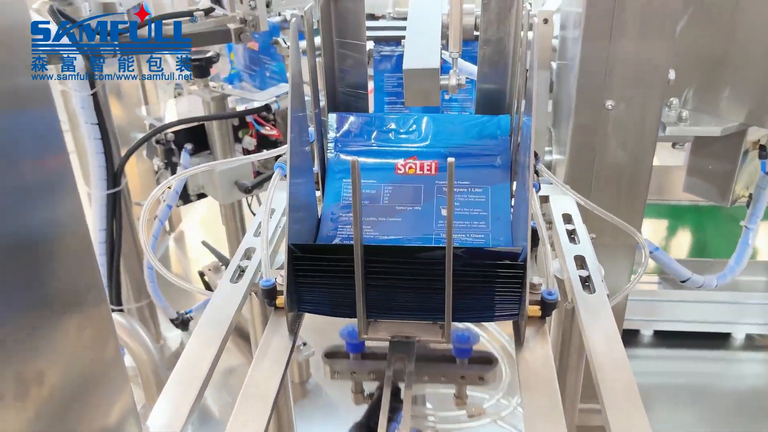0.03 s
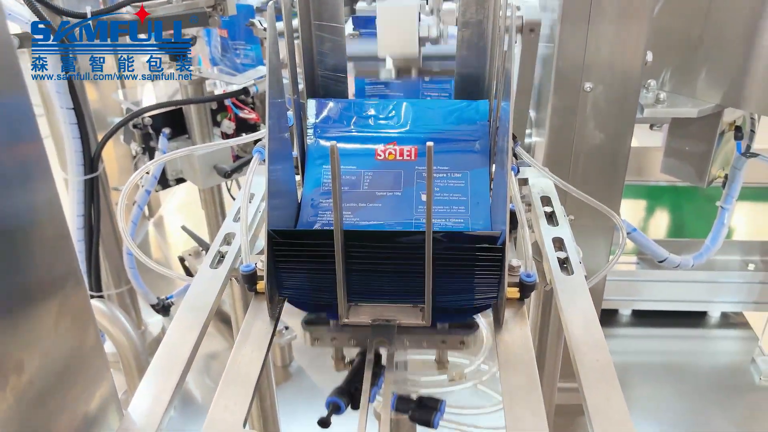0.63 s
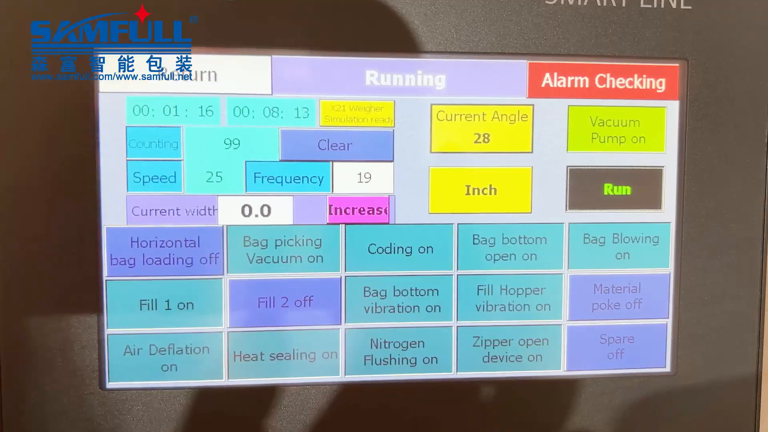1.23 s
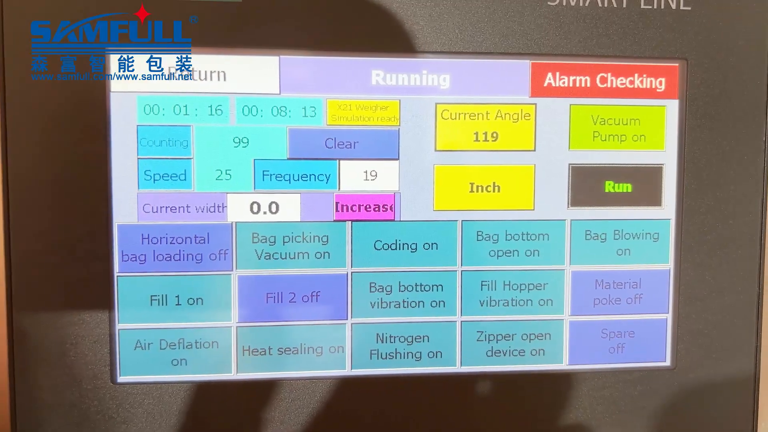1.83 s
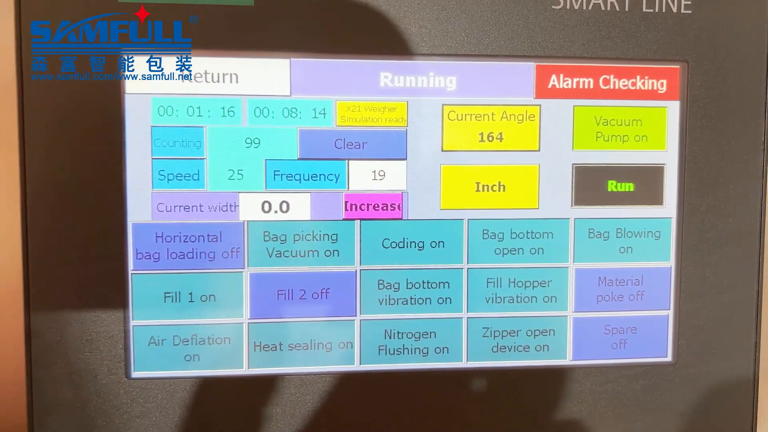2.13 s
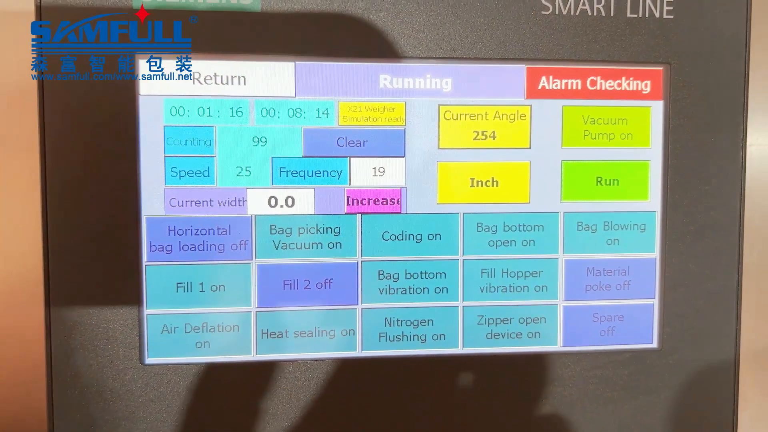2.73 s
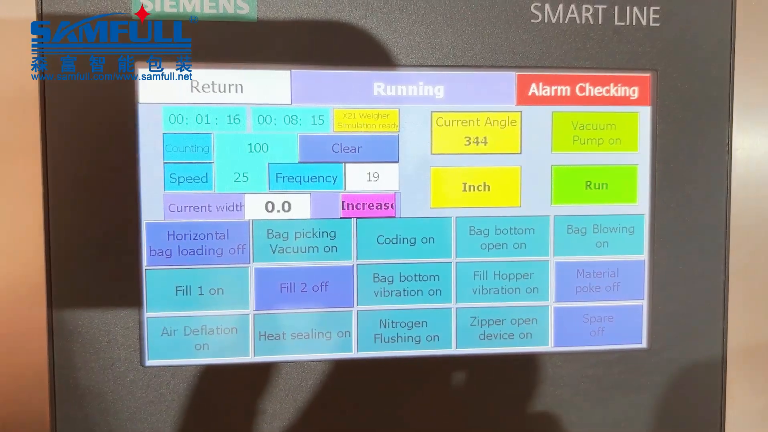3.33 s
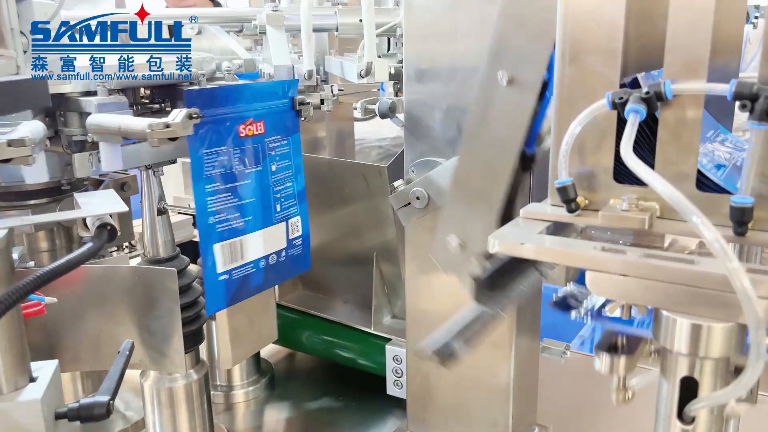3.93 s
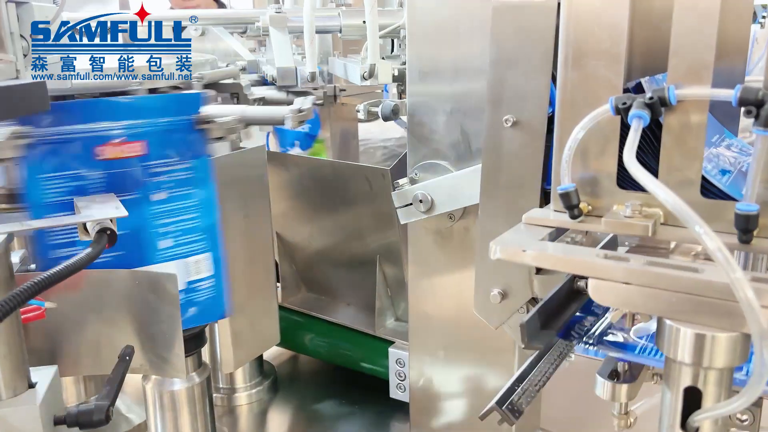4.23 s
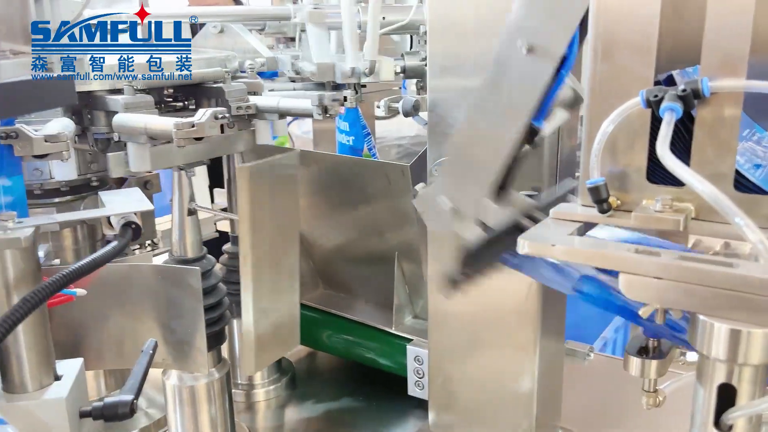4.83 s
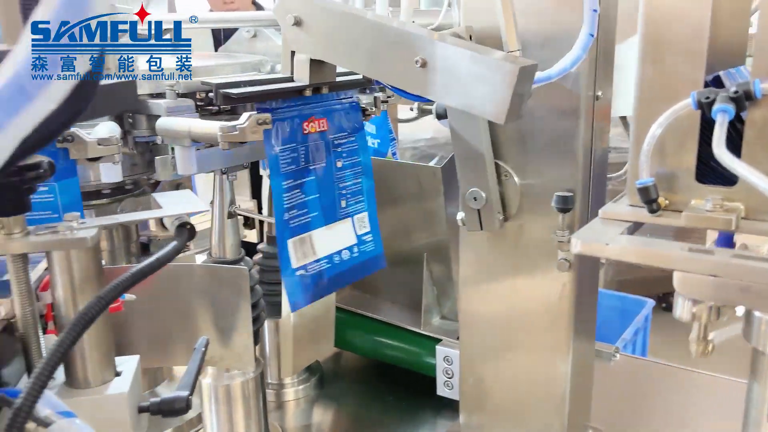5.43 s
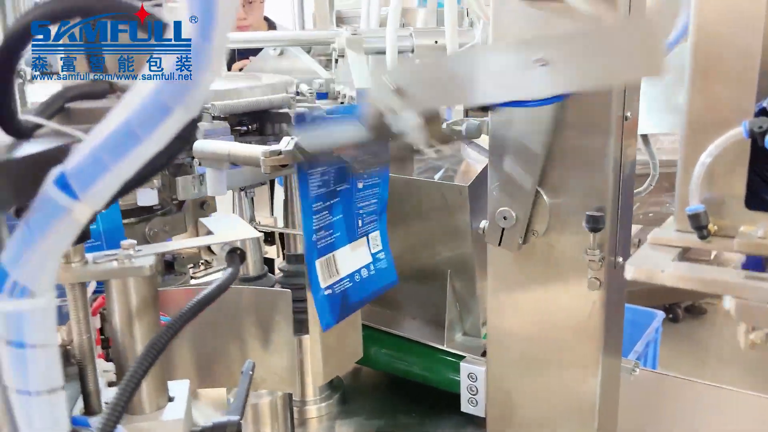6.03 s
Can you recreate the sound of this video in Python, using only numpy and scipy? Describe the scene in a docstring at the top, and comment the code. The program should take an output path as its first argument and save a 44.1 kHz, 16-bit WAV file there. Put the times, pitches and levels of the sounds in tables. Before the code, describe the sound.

An automatic pouch-packing machine runs throughout in a factory hall, heard close in stereo, with a low rumble, light mechanical chatter and a motor hum. It opens with two low thuds and metal knocks, then a bright half-second blast of compressed air at about 0.4 seconds. At 1.1 seconds the listening position changes abruptly; a cluster of thumps follows, then rushing suction and hollow venting air from 1.5 to 2.3 seconds, with small high chirps near 2. A softer air blast comes at 3.2 seconds, with more thuds until 3.8. At 3.9 the position changes again and the hum grows stronger. Sharp metallic clacks and valve puffs become frequent, with faint squeaks and a chirp near 4.6. Another air blast runs from 5 to 5.6 seconds, overlapped by thuds and rapid clicking, and a sharp puff follows near 5.8.

```python
"""Cylinders of a rotary pouch-packing machine thud on their mounts; grippers knock on its steel frame.
A nozzle blows each bag open, valves puff, suction cups draw, an ejector and a return cylinder vent.
Bags scrape off the stack, guides squeak, a dry pivot chirps. Behind it the drive rumbles and hums.
The cam-timed cycle is heard in a factory hall from three places in turn: feeder, panel, turret."""
import sys
import numpy as np
from scipy import signal
from scipy.io import wavfile
from scipy.ndimage import uniform_filter1d

SR = 44100
rng = np.random.default_rng(int(sys.argv[2]) if len(sys.argv) > 2 else 0)


def materialize(psi):
    """Save the field psi as 16-bit PCM at rate SR to the path in sys.argv[1].

    A 1-D psi becomes a single channel; in a 2-D psi each row is a channel.
    """
    bounded = np.clip(np.atleast_2d(psi).T, -1, 1)
    quanta = np.round(bounded * 32767).astype(np.int16)
    wavfile.write(sys.argv[1], SR, quanta)


N = 272979
CYCLE_S = 2.4  # one camshaft turn; cycle t counts from the nozzle opening
TIME_S = np.arange(N) / SR
CYCLE_TIME_S = np.arange(round(CYCLE_S * SR)) / SR
AGE_S = np.arange(SR) / SR  # time within one event
PAN = np.array([[.5], [-.5]])  # share of a left-right level difference

# listening places (feeder, panel, turret): from t/s, a cycle start t/s
PLACES = [(0, -.378), (1.136, .797), (3.904, 2.635)]
# cylinder thuds: t/s, level/dB, f/Hz, swell/s, cover rattle/dB
THUDS = [(.002, -10.5, 134, 0.018, -14.5), (.085, -27, 128, 0.023, -41), (.199, -7.5, 126.4, 0.014, -18),
         (.28, -22.5, 112, 0.033, -40), (.587, -17, 129, 0.014, -21.5), (.625, -24, 127, 0.023, -41),
         (1.142, -18.5, 124, 0.0095, -26), (1.183, -12, 131, 0.016, -33), (1.29, -23, 134, .022, -29),
         (1.358, -12.5, 133, 0.017, -29), (1.405, -20, 131, 0.017, -41), (1.445, -22, 123, 0.017, -34),
         (1.747, -18.5, 135, 0.013, -35), (3.42, -14.5, 128, 0.02, -27), (3.579, -11, 111, 0.007, -24),
         (3.619, -18.5, 111, 0.015, -37), (3.764, -10, 123, 0.009, -24), (5.264, -12, 136, 0.018, -22),
         (5.421, -10.5, 129, 0.018, -23), (5.603, -6.5, 128, 0.0059, -22.5), (5.649, -24, 127, 0.017, -33),
         (5.984, -19, 137, 0.017, -30)]
# deeper mid-cycle bump: cycle t/s, f/Hz, swell/s
BUMP = (1.245, 73, 0.025)
# gripper knocks: t/s, frame/dB, crack/dB, rise/s, fall/s, part f/Hz, ring/dB, left-right/dB, tail/dB
KNOCKS = [(.073, -34, -22, 0.0037, .014, 1003, -25, -5, -37),
          (.146, -21.5, -19.5, 0.0037, 0.013, 890, -30, -2, -41),
          (.436, -23.5, -29, 0.0034, .013, 780, -34, 2.5, -45),
          (.75, -24, -42, 0.0036, .01, 716, -33, 1, -48),
          (1.266, -32, -36, .004, 0.016, 1280, -40, -1, -48),
          (1.296, -27, -42, .003, .01, 1450, -44, -8, -55),
          (1.326, -44, -27.5, .004, .014, 2500, -38, -2, -40),
          (1.375, -27.5, -30, 0.0036, 0.02, 701, -25, -7, -38),
          (2.369, -34, -30, .004, 0.035, 2450, -29, 0, -44),
          (2.726, -36, -48, .004, .01, 650, -28, -11, -56),
          (3.033, -23, -35, 0.0053, 0.011, 926, -22, 1, -41),
          (3.042, -26, -40, .003, .013, 1075, -26, -11, -49),
          (3.386, -37, -30, .004, .012, 1080, -38, -1, -42),
          (3.696, -31, -28, .004, .013, 1060, -29, 1, -34),
          (3.725, -35, -27, 0.0053, .01, 700, -35, -3, -35),
          (3.777, -31, -32, 0.0037, 0.014, 710, -22.5, -10, -45),
          (3.875, -31, -36, .004, 0.015, 1090, -39, 3, -42),
          (4.207, -28, -22.5, 0.0065, 0.025, 2474, -23, 0, -34),
          (4.242, -40, -28.5, .003, .011, 3310, -25, 0, -46),
          (4.557, -21.5, -28.5, 0.0052, 0.014, 691, -17.5, -2, -45),
          (4.599, -31, -32, .003, 0.012, 690, -24, -4, -50),
          (4.679, -33, -27.5, 0.0018, 0.025, 3360, -36, -2, -43),
          (4.821, -29.5, -24.5, 0.0034, 0.079, 1090, -45, -1, -38),
          (4.87, -18.5, -27, 0.0062, 0.01, 1070, -20, -1, -35),
          (4.88, -23, -37, 0.0024, 0.013, 663, -17, -9, -45),
          (5.045, -22.5, -28.5, 0.0012, 0.015, 1100, -33, 2, -47),
          (5.226, -29, -19.5, 0.0046, 0.032, 707, -30, 0, -38),
          (5.4881, -26, -17, .0006, .006, 1620, -19.5, -.5, -43),
          (5.525, -26, -23, 0.0027, .009, 1090, -34, 1, -41),
          (5.553, -24, -26, 0.0026, .007, 1160, -26, -1, -44),
          (5.5645, -27, -22, 0.0017, 0.0078, 1930, -21, 0, -48),
          (5.57, -24, -20.5, 0.0011, .004, 2510, -19.5, 1, -48),
          (5.6125, -23.5, -21.5, .001, .011, 732, -16.5, -1, -40),
          (5.627, -26, -29, .001, 0.01, 1420, -36, 3, -42),
          (5.665, -28, -25, .004, .008, 2580, -20, 2, -39),
          (5.7095, -29, -23.5, .0015, .009, 4200, -26, -1, -36),
          (5.794, -39, -27.5, .002, 0.03, 1450, -27, -2, -44),
          (5.844, -29.5, -25.5, 0.0013, .02, 1390, -41, 0, -48),
          (6.014, -34, -29, 0.0032, 0.0092, 1380, -42, -2, -40),
          (6.155, -27, -33, 0.0011, 0.011, 712, -28, -2, -47)]
# valve puffs: t/s, level/dB, fall/s
PUFFS = [(.251, -31.5, 0.085), (.29, -23, 0.027), (0.431, -15.5, 0.022), (.6, -32, 0.055),
         (.742, -26.5, 0.036), (1.426, -35.5, .06), (1.465, -29.5, 0.016), (1.603, -24.5, 0.031),
         (1.76, -39, .09), (2.316, -46, .03), (2.365, -38, .012), (2.557, -38, .06), (2.81, -49, 0.41),
         (3.086, -38, 0.017), (3.826, -32, 0.046), (3.865, -28, 0.016), (4.075, -35, 0.011),
         (4.152, -32, 0.087), (4.203, -27, 0.0073), (4.39, -30, 0.057), (4.458, -31, 0.013),
         (4.5, -44, 0.36), (4.647, -31, 0.26), (4.924, -30, 0.012), (5.042, -25, 0.016),
         (5.662, -25.5, 0.059), (5.703, -27, 0.02), (5.841, -14.5, 0.014), (6.012, -28, 0.015),
         (6.04, -36.5, 0.18), (6.153, -26.5, 0.017)]
# sliding guides: cycle t/s, length/s, f/Hz, nominal width/Hz, relative level/dB, fall/s
SQUEAKS = [(0.192, 0.5, 226, 27.4, -10.5, 0.16), (0.681, 0.039, 314, 24.4, -0.5, 0.064),
           (0.67, 0.02, 12150, 400, -8, 0.032), (0.975, 0.071, 273, 36, -4.5, 0.031),
           (1.761, .028, 11880, 260, -10.5, .02), (1.931, 0.04, 227, 39.4, -3.5, 0.041),
           (2.192, 0.15, 2470, 55, -13, 0.16), (2.227, 0.017, 350, 31.6, 0.5, 0.079)]
# pivot chirps: t/s, level/dB, start f/Hz, length/s
CHIRPS = [(2.01, -32, 5210, .014), (2.08, -29.5, 4900, .028), (2.757, -36, 4800, .02),
          (4.585, -26.5, 4600, 0.018)]
# motor hum along the listener's path: t/s, relative level/dB, left-right/dB
HUM = [(1.14, -49, 8), (1.18, -36.5, -3), (1.8, -25.5, 4.5), (2.51, -28.5, 9.0), (2.92, -32, 9.5),
       (3.06, -41, 8), (3.09, -35, 0.5), (3.44, -26, 1), (3.85, -29, 7), (3.96, -21.5, -1.5),
       (4.72, -19, -1.5), (5.33, -31, -4.5), (5.63, -24, -3), (6.12, -18, -1), (6.19, -18.5, -1.5)]
# gear and pump whines: f/Hz, relative level/dB
WHINES = [(506, -43.5), (1263, -48.5), (1464, -43.5), (3042, -59.5)]

# level curves: t/s, relative level/dB
AIR_SURGE = [(3.66, -60), (3.77, -29.5), (3.897, -26), (3.91, -70)]
FLOOR_SHUDDER = [(0.0, -36), (0.05, -41), (0.53, -42), (0.65, -63), (1.36, -29), (1.45, -44), (2.74, -52),
                 (2.84, -33), (2.98, -47), (3.72, -29), (4.52, -45), (4.67, -33), (5.1, -40), (5.16, -56),
                 (5.38, -34), (6.03, -47), (6.1, -37), (6.19, -58)]

# cam-timed strokes: cycle t/s, length/s, rise/s, fall/s
NOZZLE_BLAST = (0.0072, 0.5, 0.093, 0.045)
BAG_FILL = (0.433, 0.082, 0.034, 0.11)
SUCTION_DRAW = (0.72, 0.62, 0.44, 0.23)
EJECTOR_VENT = (0.807, 0.39, 0.13, 0.16)
BAG_SLIDE = (1.226, 0.223, 0.13, 0.024)
RETURN_VENT = (1.99, 0.074, 0.06, 0.14)

# source gain by place: feeder/dB, panel/dB, turret/dB
BUMP_DB = (-33, -18, -19)
NOZZLE_DB = (-18, -25, -19.5)
ROAR_DB = (-26.5, -34, -25.5)
LEAK_DB = (-33, -36.5, -38)
BAG_FILL_DB = (-26, -30.5, -26.5)
SUCTION_DB = (-26.5, -23, -54)
EJECTOR_DB = (-61, -26.5, -46)
RETURN_DB = (-40, -36, -32)
SLIDE_DB = (-31, -37, -45)
SQUEAK_DB = (-28, -33.5, -24.5)
RUMBLE_DB = (-30, -31, -29)
MECHANISM_DB = (-26.5, -31, -29.5)

# resonances: f/Hz, width/Hz, relative level/dB
BASE_MODES = [(129, 6.4, 9), (145, 22, 15.5), (193, 41, 4.5), (250, 15, 3), (307, 22, 7.5), (467, 3.1, -1)]
FRAME_MODES = [(276, 235, 4.5), (600, 65, 2.5), (703, 43, 6.5), (868, 35, 4), (1045, 17, 4),
               (1240, 53, -23), (2030, 110, -17), (2360, 140, -0.5), (3600, 49, -13)]
ARM_MODES = [(1424, 23, -8), (1860, 74, -1), (2210, 34, 7), (2460, 45, 4), (3250, 37, -10), (4040, 120, -1),
             (5200, 41, 1)]
NOZZLE_MODES = [(6200, 630, -6), (9600, 400, -11), (10700, 500, -1), (12000, 330, 1), (13500, 500, 5),
                (14500, 450, 8), (15100, 600, 3)]
PANEL_MODES = [(540, 25, 8.5), (788, 150, 4), (934, 39, 6), (1045, 44, 5), (1224, 17, -10), (1465, 11, 9),
               (1720, 83, -12), (1970, 31, 4), (2138, 21, 7.5), (2540, 110, 0), (3030, 7.5, 8),
               (3230, 32, -0.5), (4410, 89, -4.5)]
GUIDE_MODES = [(494, 25, 0), (1100, 14, 6), (1450, 25, -4)]

# noise spectra: f/Hz, relative density/dB
COVER_SPECTRUM = [(170, 17.5), (290, 2.5), (410, 12.5), (600, -16)]
CRACK_SPECTRUM = [(900, 9.5), (1400, 7.5), (2500, 4), (3500, 2), (4800, -4), (6700, -5.5), (9500, -8.5),
                  (16000, -32)]
JET_SPECTRUM = [(4000, -10), (6000, -2), (8000, -9), (10000, 2.5), (16000, 2)]
ROAR_SPECTRUM = [(700, 6), (1500, 0.5), (2500, -0.5), (4000, -2), (6000, -8), (8000, 0)]
VALVE_SPECTRUM = [(2000, 10), (4000, 1), (6000, 13), (8000, 1.5), (10500, 12), (12500, 10), (16000, 2.5)]
RUSH_SPECTRUM = [(500, -11), (1000, -2), (1700, -0.5), (2400, -1), (3300, -3), (4700, -9), (6700, -9),
                 (9500, -26), (16000, -45)]
EXHAUST_SPECTRUM = [(1500, -1), (3000, -3.5), (4500, 3.5), (6000, 8), (8000, -8), (11000, -7), (16000, -9)]
RUMBLE_SPECTRUM = [(60, -33), (85, -5), (110, -1.5), (160, -7), (240, -5), (330, -13.5), (450, -15)]
MECHANISM_SPECTRUM = [(250, 2), (400, 1.5), (520, 5), (750, -3.5), (1100, 1.5), (1500, 1.5), (2200, -9.5),
                      (3200, -11.5), (5000, -16.5), (7500, -36.5), (11000, -7), (16000, -32)]
SHUDDER_SPECTRUM = [(22, -34), (36, -19), (48, 21), (65, -17), (95, -22)]

# how alike the left and right microphones sound: f/Hz, correlation
STEREO_LIKENESS = [(60, 0.99), (130, 0.99), (290, 0.89), (640, 0.38), (1500, 0), (2500, 0.5), (3400, 0.39),
                   (4700, 1), (6700, 1), (9500, 0.95), (12000, 1), (16000, 0.87)]


def cylinders(base_db=-17, base_fall_s=0.082, rattle_rise_s=0.0039, rattle_fall_s=0.034, grain_db=5):
    """Each stroke rocks the machine on its mounts: a low note, a rumbling base, rattling covers."""
    notes = placed((s, from_db(db) * rock(AGE_S, hz, swell_s)) for s, db, hz, swell_s, _ in THUDS)
    shaking = placed((s, from_db(db) * stroke(AGE_S, 0, 0.0055, base_fall_s)) for s, db, *_ in THUDS)
    rattle_shape = stroke(AGE_S, rattle_rise_s, rattle_rise_s, rattle_fall_s)
    rattling = placed((s - rattle_rise_s, from_db(db) * rattle_shape) for s, *_, db in THUDS)
    base = from_db(base_db) * body(shaking * white(), BASE_MODES)
    covers = rattling * rms_one(from_db(grain_db * drift(85))) * noise(COVER_SPECTRUM)
    start_s, hz, swell_s = BUMP
    bump = rock((CYCLE_TIME_S - start_s) % CYCLE_S, hz, swell_s)
    return notes + base + covers + cycled(bump, BUMP_DB)


def rock(age_s, hz, swell_s):
    """Swing on the mounts: a low sine swells and dies."""
    swell = np.minimum(age_s / swell_s, 20)
    return swell ** 2 * np.exp(2 * (1 - swell)) * np.sin(2 * np.pi * hz * age_s)


def grippers(grain_db=2, contact_hz=2500, hold_s=0.0041, tail_rise_s=0.004, tail_fall_s=0.035):
    """A knock is a cluster of contacts: bright crack, dull frame, struck part, steel arm tail."""
    pushes, cracks, tails, rings = [], [], [], []
    for s, frame_db, crack_db, rise_s, fall_s, hz, ring_db, pan_db, tail_db in KNOCKS:
        pan = from_db(pan_db * PAN)
        shape = pan * stroke(AGE_S, rise_s + hold_s, rise_s, fall_s)
        pushes.append((s, from_db(frame_db) * shape))
        cracks.append((s, from_db(crack_db) * shape))
        tails.append((s, from_db(tail_db) * stroke(AGE_S, tail_rise_s, tail_rise_s, tail_fall_s)))
        rings.append((s, from_db(ring_db) * pan * struck_part(hz, rise_s)))
    contacts = rms_one(from_db(grain_db * np.minimum(drift(380), 1)))
    force = signal.sosfilt(signal.butter(1, contact_hz, fs=SR, output="sos"), contacts * white())
    frame = body(placed(pushes) * force, FRAME_MODES)
    arms = placed(tails) * body(white(), ARM_MODES)
    crack = placed(cracks) * contacts * noise(CRACK_SPECTRUM)
    return frame + crack + placed(rings) + arms


def struck_part(hz, push_s, lag_s=0.003, lower_ratio=.87, lower_db=-4.5, ear_spread_rad=0.75):
    """Two close modes swing up just after the push; small, high parts die sooner."""
    phases = rng.uniform(0, 2 * np.pi, (2, 1, 1)) + ear_spread_rad * rng.standard_normal((2, 2, 1))
    modes_hz = hz * np.array([[[1]], [[lower_ratio]]])
    upper, lower = np.sin(2 * np.pi * modes_hz * AGE_S + phases)
    rise_s = push_s + lag_s
    fall_s = 0.018 * (700 / hz) ** 0.32
    return stroke(AGE_S, rise_s, rise_s, fall_s) * (upper + from_db(lower_db) * lower)


def air(flutter_db=1.1, rough_db=-0.25):
    """Nozzle, valve and rush noise under one fluttering level."""
    flow = nozzle() + valves() + rush()
    return flow * from_db(flutter_db * drift(15.4) + rough_db * drift(87))


def nozzle(jet_db=-1.5, overtone_db=-9.5):
    """A blast opens each bag: bright jet, nozzle overtones, lower roar."""
    blast = burst(*NOZZLE_BLAST)
    jet = from_db(jet_db) * noise(JET_SPECTRUM) + from_db(overtone_db) * body(white(), NOZZLE_MODES)
    return cycled(blast, NOZZLE_DB) * jet + cycled(blast, ROAR_DB) * noise(ROAR_SPECTRUM)


def valves(rise_s=0.003, silencer_s=0.013):
    """Short puffs of air, rounded by the silencers."""
    puffs = placed((s, from_db(db) * stroke(AGE_S, rise_s, rise_s, fall_s)) for s, db, fall_s in PUFFS)
    return uniform_filter1d(puffs, int(silencer_s * SR) + 1) * noise(VALVE_SPECTRUM)


def rush(panel_db=-5.5):
    """Leaks, bag filling, suction cups and one surge add in power; the air rings the steel panels."""
    leaks = cycled(np.ones_like(CYCLE_TIME_S), LEAK_DB)
    filling = cycled(burst(*BAG_FILL), BAG_FILL_DB)
    suction = cycled(burst(*SUCTION_DRAW), SUCTION_DB)
    surge = from_db(in_time(AIR_SURGE)[0])
    level = np.linalg.norm([leaks, filling, suction, surge], axis=0)
    return level * (noise(RUSH_SPECTRUM) + from_db(panel_db) * body(white(), PANEL_MODES))


def ejector(hz=2950, width_hz=1700, hiss_db=-8, hiss_exponent=1.7):
    """The vacuum ejector vents through its silencer: hollow rush, hiss at full pressure."""
    pressure = burst(*EJECTOR_VENT)
    hiss = cycled(pressure ** hiss_exponent, EJECTOR_DB) * noise(VALVE_SPECTRUM)
    return cycled(pressure, EJECTOR_DB) * narrow_noise(hz, width_hz) + from_db(hiss_db) * hiss


def exhaust():
    """A returning cylinder vents late in the cycle: soft, duller hiss."""
    return cycled(burst(*RETURN_VENT), RETURN_DB) * noise(EXHAUST_SPECTRUM)


def bag_slide():
    """A bag leaves the stack and scrapes along its ringing guide."""
    return cycled(burst(*BAG_SLIDE), SLIDE_DB) * body(white(), GUIDE_MODES)


def squeaks(rise_s=0.00093):
    """Friction feeds one narrow resonance while a part slides."""
    out = 0
    for s, length_s, hz, width_hz, db, fall_s in SQUEAKS:
        friction = from_db(db) * burst(s, length_s, rise_s, fall_s)
        out = out + cycled(friction, SQUEAK_DB) * narrow_noise(hz, 0.86 * width_hz)
    return out


def pivot(sag_hz_per_s=5500, rough_hz=310, rise_s=0.004, fall_s=0.012):
    """A dry pivot gives rough chirps that fall in pitch as the arm slows."""
    chirps = []
    for s, db, start_hz, length_s in CHIRPS:
        sag_hz = sag_hz_per_s * np.minimum(AGE_S, length_s + 2 * fall_s)
        pitch_hz = start_hz - sag_hz + rough_hz * drift(370)[:len(AGE_S)]
        tone = np.sin(2 * np.pi * np.cumsum(pitch_hz) / SR)
        chirps.append((s, from_db(db) * stroke(AGE_S, length_s, rise_s, fall_s) * tone))
    return placed(chirps)


def drive(load_peak_s=0.35, rumble_swing_db=2.5, wash_swing_db=1, loose_share=0.26, panel_db=-23.5):
    """Gearbox rumble and the wash of cams and chains follow the cyclic load; the floor shudders."""
    load = np.cos(2 * np.pi * (CYCLE_TIME_S - load_peak_s) / CYCLE_S)
    contacts = loose_contacts(per_s=64, size_db=4.5, fall_s=0.042)
    chatter = np.sqrt(1 - loose_share + loose_share * contacts)
    wash = noise(MECHANISM_SPECTRUM) + from_db(panel_db) * body(white(), PANEL_MODES)
    mechanism = cycled(from_db(wash_swing_db * load), MECHANISM_DB) * chatter * wash
    rumble = cycled(from_db(rumble_swing_db * load), RUMBLE_DB) * noise(RUMBLE_SPECTRUM)
    shudder = from_db(in_time(FLOOR_SHUDDER)[0] + 2.5) * noise(SHUDDER_SPECTRUM)
    return rumble + shudder + mechanism


def loose_contacts(per_s, size_db, fall_s):
    """Power envelope of small random contacts; mean 1."""
    sizes = from_db(size_db * np.minimum(rng.exponential(1, N), 4)) ** 2
    hits = sizes * (rng.random(N) < per_s / SR)
    power = signal.lfilter([1], [1, -np.exp(-2 / (fall_s * SR))], hits + 1e-18)
    return power / power.mean()


def motor(hum_hz=366.5, hum_db=-0.4, waver_db=-0.4, whine_db=-1, whine_waver_db=6.5):
    """One clean motor hum; faint gear and pump whines waver in each ear."""
    level_db, pan_db = in_time(HUM)
    phase = 2 * np.pi * hum_hz * TIME_S + 0.34 * drift(3.6)
    level = from_db(hum_db + level_db + waver_db * drift(0.77) + pan_db * PAN)
    out = level * np.sin(phase + np.array([[0], [.2]]))
    for hz, db in WHINES:
        for ear in range(2):
            whine_level = from_db(db + whine_db + whine_waver_db * drift(2.7))
            out[ear] += whine_level * np.sin(2 * np.pi * hz * TIME_S + 1.53 * drift(4.5))
    return np.sqrt(2) * out


def stroke(age_s, length_s, rise_s, fall_s):
    """Linear rise, hold, exponential fall after length_s."""
    return np.clip(age_s / rise_s, 0, 1) * np.exp(-np.clip((age_s - length_s) / fall_s, 0, 30))


def burst(start_s, length_s, rise_s, fall_s):
    """One stroke envelope, wrapped into the cycle."""
    return stroke((CYCLE_TIME_S - start_s) % CYCLE_S, length_s, rise_s, fall_s)


def cycled(cycle, place_db):
    """Repeat one cycle with the timing and gain of each place."""
    since_s, cycle_start_s = np.transpose(PLACES)
    place = np.searchsorted(since_s, TIME_S, "right") - 1
    index = ((TIME_S - cycle_start_s[place]) * SR).astype(int) % len(cycle)
    return cycle[index] * from_db(place_db)[place]


def placed(events):
    """Sum (t/s, samples) events into a stereo track."""
    out = np.zeros((2, N + len(AGE_S)))
    for s, samples in events:
        start = max(int(s * SR), 0)
        out[:, start:start + len(AGE_S)] += samples
    return out[:, :N]


def body(force, modes):
    """Stereo noise through a set of resonances; power kept."""
    ring = sum(spread(resonate(force, hz, width_hz), hz, db) for hz, width_hz, db in modes)
    power = sum(np.pi * width_hz / SR * from_db(db) ** 2 for _, width_hz, db in modes)
    return ring / np.sqrt(power)


def resonate(x, hz, width_hz):
    """One resonance; peak gain 1."""
    r = np.exp(-np.pi * width_hz / SR)
    feedback = [1, -2 * r * np.cos(2 * np.pi * hz / SR), r * r]
    return signal.lfilter(np.array([1, 0, -1]) * (1 - r * r) / 2, feedback, x + 1e-18)


def narrow_noise(hz, width_hz):
    """Stereo noise twice through one resonance; rms 1."""
    once = resonate(white(), hz, width_hz)
    return rms_one(spread(resonate(once, hz, width_hz), hz))


def noise(spectrum):
    """Stereo noise from half-octave bands; rms 1."""
    edges_hz = 22 * 2 ** (np.arange(20) / 2)
    sources = white(), white()  # alternated: adjacent bands stay independent
    out = 0
    for k, (low_hz, high_hz) in enumerate(zip(edges_hz, edges_hz[1:])):
        hz = np.sqrt(low_hz * high_hz)
        if spectrum[0][0] < hz < spectrum[-1][0]:
            bandpass = signal.butter(2, [low_hz, high_hz * 1.03], "band", fs=SR, output="sos")
            out = out + spread(signal.sosfilt(bandpass, sources[k % 2]), hz, at_hz(spectrum, hz))
    return rms_one(out)


def spread(pair, hz, db=0):
    """Mix two independent signals to left and right with the stereo likeness at hz."""
    correlation = np.clip(at_hz(STEREO_LIKENESS, hz), -.999, .999)
    mid, side = from_db(db) * np.sqrt([1 + correlation, 1 - correlation])
    return np.array([[mid, side], [mid, -side]]) @ pair


def drift(rate_hz, step=40, settle=2000):
    """Smooth random wander; rms 1."""
    r = np.exp(-2 * step * np.pi * rate_hz / SR)
    kicks = rng.standard_normal(N // step + settle + 2)
    slow = signal.lfilter([1], [1, -2 * r, r * r], kicks)[settle:]
    return np.interp(np.arange(N) / step, np.arange(len(slow)), rms_one(slow))


def in_time(rows):
    """Each column of a curve, per sample."""
    s, *columns = np.transpose(rows)
    return [np.interp(TIME_S, s, column) for column in columns]


def at_hz(points, hz):
    """Table value on a log-frequency axis."""
    points_hz, values = np.transpose(points)
    return np.interp(np.log(hz), np.log(points_hz), values)


def white():
    return rng.standard_normal((2, N))


def from_db(db):
    return 10 ** (np.asarray(db) / 20)


def rms_one(x):
    return x / np.sqrt(np.mean(x ** 2) + 1e-20)


def scene(dip_depth=0.91, dip_s=0.0039):
    """All sources; the level dips briefly at each change of place."""
    dips = [1 - dip_depth * np.exp(-((TIME_S - s) / dip_s) ** 2) for s, _ in PLACES[1:]]
    impacts = cylinders() + grippers()
    pneumatics = air() + ejector() + exhaust()
    friction = bag_slide() + squeaks() + pivot()
    return (impacts + pneumatics + friction + drive() + motor()) * np.prod(dips, axis=0)


def record(dry, low_cut_hz=33, high_cut_hz=15830, ceiling=.8):
    """Bass cut, microphone ports in opposite phase in two treble bands, rounded peaks, top cut."""
    left, right = signal.sosfilt(signal.butter(4, low_cut_hz, "high", fs=SR, output="sos"), dry)
    for hz, width_hz in [(7700, 4000), (16500, 2900)]:
        right = right - 2 * resonate(right, hz, width_hz)
    stereo = np.array([left, right])
    rounded = stereo / (1 + (stereo / ceiling) ** 6) ** (1 / 6)
    return signal.sosfilt(signal.ellip(10, .2, 80, high_cut_hz, fs=SR, output="sos"), rounded)


dry = scene()
out = record(dry)
materialize(out)
```